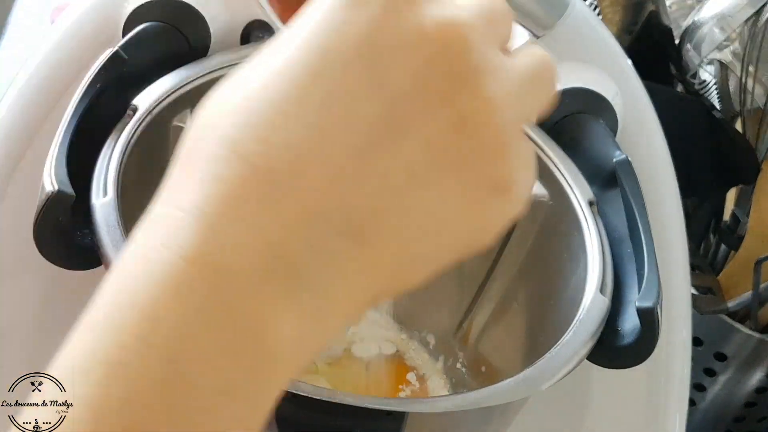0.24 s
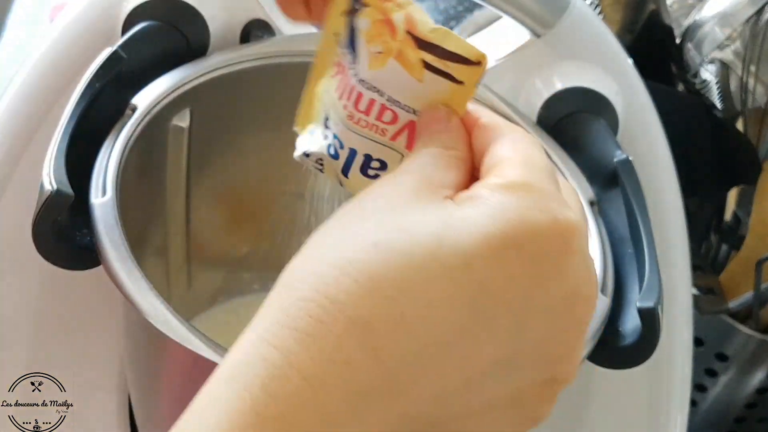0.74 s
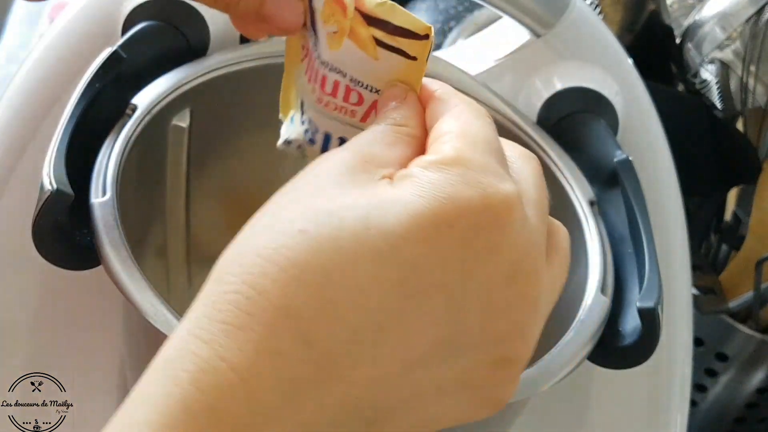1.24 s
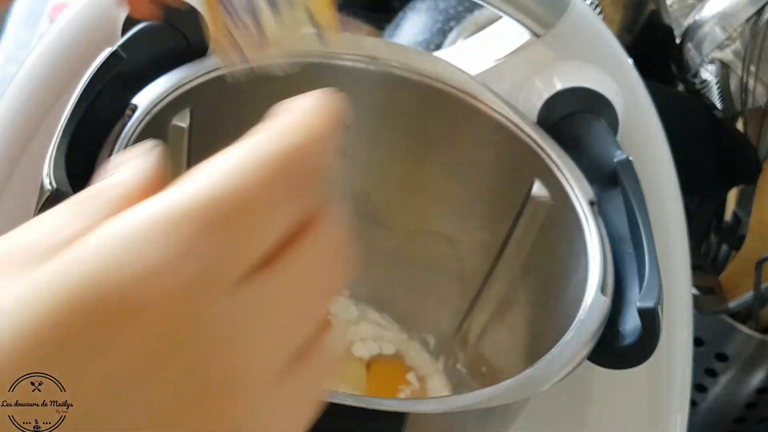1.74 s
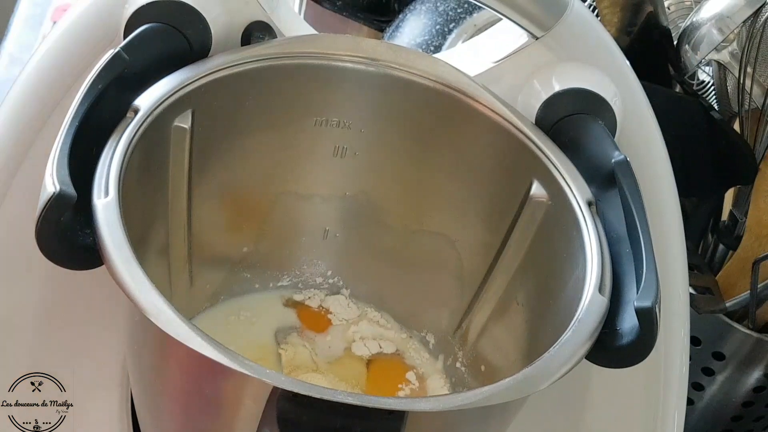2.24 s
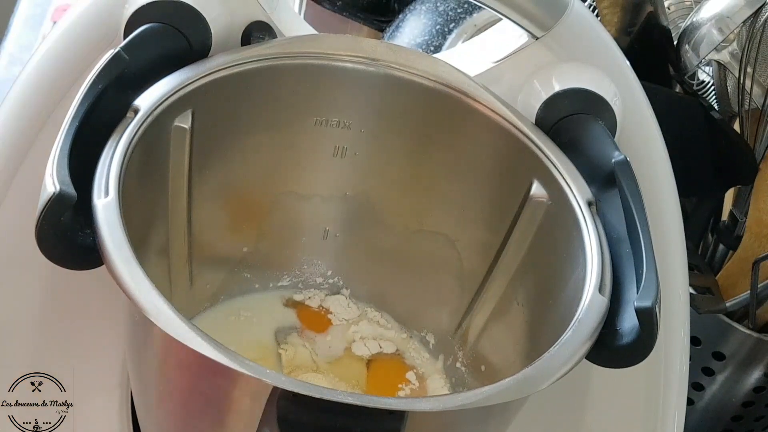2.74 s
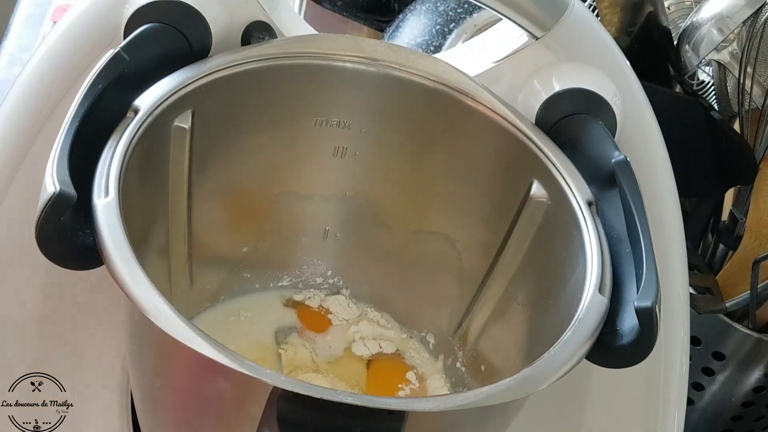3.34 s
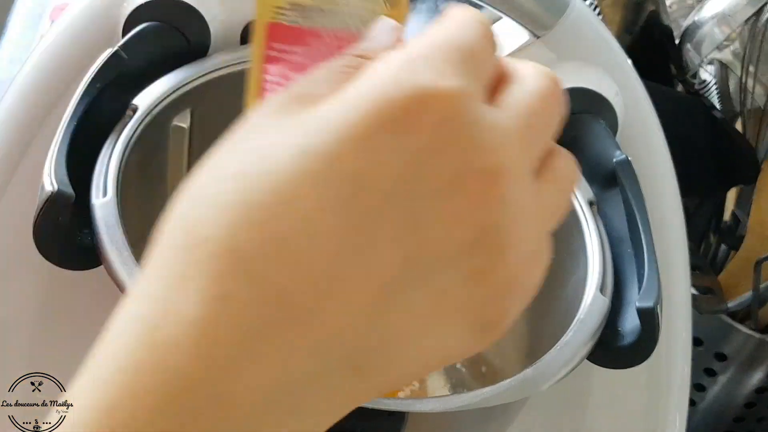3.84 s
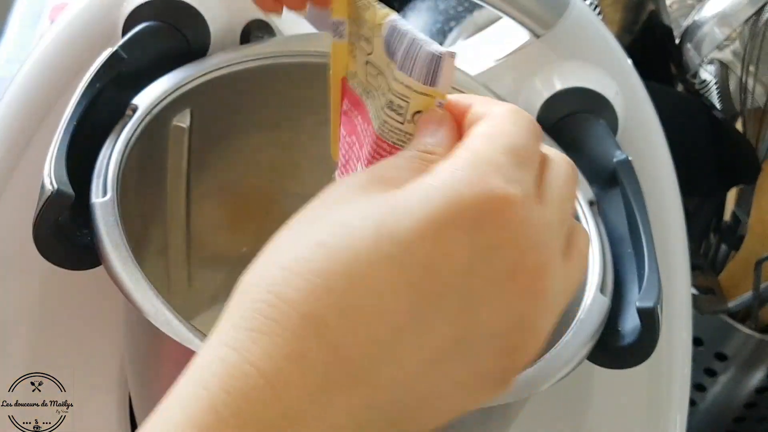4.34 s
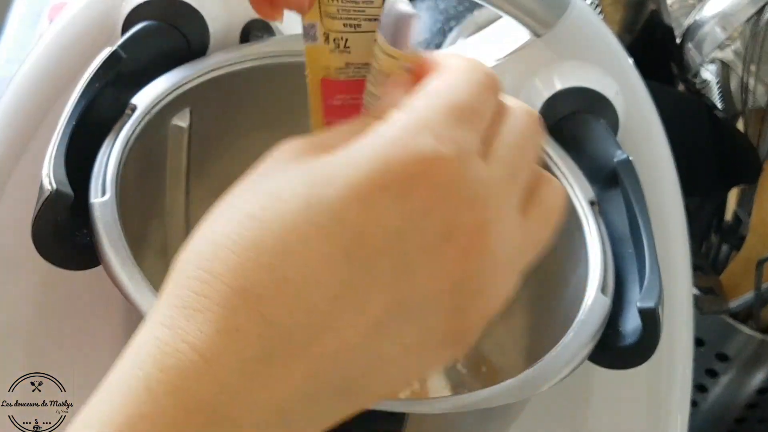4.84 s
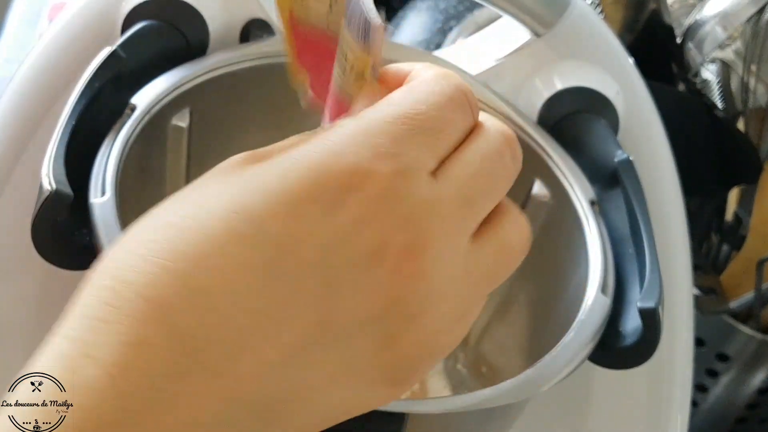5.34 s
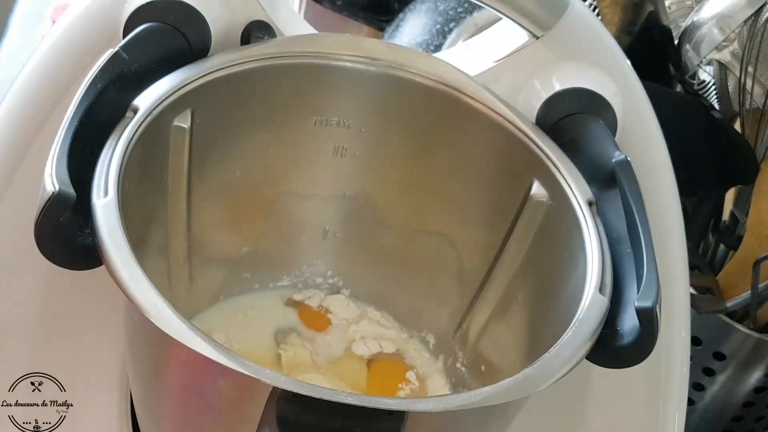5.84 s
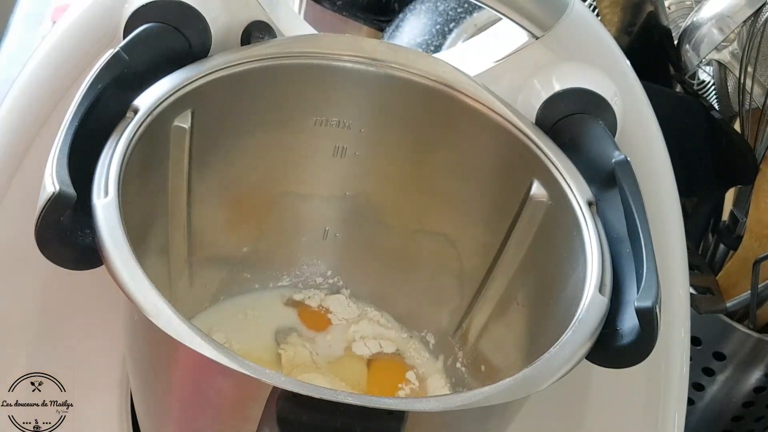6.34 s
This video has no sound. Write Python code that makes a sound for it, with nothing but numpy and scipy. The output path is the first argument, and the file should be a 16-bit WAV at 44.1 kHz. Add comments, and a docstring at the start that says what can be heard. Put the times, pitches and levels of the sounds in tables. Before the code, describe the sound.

Close stereo pickup over a mixing bowl: quick dry paper taps mixed with soft bright powder hiss, a low faint hum underneath. A pause holds a soft bump, a loud hard knock with clatter, and paper crinkling. Then another hiss of powder, a crinkle and a few sharp flicks, with short kitchen echoes before near silence.

```python
"""Small paper sachets are shaken empty over a steel mixing bowl in a kitchen. Flicks, rustles and tiny creases
are noise bursts and grains through the resonances of the paper; the powder is a bright noise hiss in surges.
Between the sachets something hard is knocked down on the worktop and bounces: decaying modes with a noisy
rattle, and a soft dull bump of low modes. A low hum, nearly a sine, wavers, slides down and fades over
the quiet room air, two beds of steady noise and the kitchen's short echoes."""
import sys
import numpy as np
from scipy import signal
from scipy.io import wavfile

SR = 44100
rng = np.random.default_rng(int(sys.argv[2]) if len(sys.argv) > 2 else 0)


def digitize_waveform(pressure):
    """Quantize a signal to 16-bit integers and store it at the path in sys.argv[1].

    Rows of a 2-D input are taken as channels; values are limited to [-1, 1].
    """
    field = np.atleast_2d(pressure).T
    bounded = np.clip(field, -1, 1)
    quanta = np.round(bounded * 32767).astype(np.int16)
    wavfile.write(sys.argv[1], SR, quanta)


N = 290775   # length in samples

# resonances of the air pocket in the sachet: pitch_hz, width_hz, level_db
BODY_MODES = [(432, 198, 1.5), (694, 220, 1.5), (1147, 420, -1), (1580, 560, 3)]
# bright resonances of a sharp crease, also the crack of a knock: pitch_hz, width_hz, level_db
EDGE_MODES = [(5000, 4000, 1.5), (8570, 2350, -7.5), (12400, 15000, -6.5)]

STEADY_FLICKER_DB = 0.5   # depth of the level flicker in powder and room air


def from_db(db):
    """Decibels to amplitude."""
    return 10 ** (np.asarray(db) / 20)


def rms_one(x):
    """Scale to an rms of 1."""
    return x / np.sqrt(np.mean(x ** 2) + 1e-20)


def peak_one(x):
    """Scale to a peak of 1."""
    return x / np.max(np.abs(x))


def level_in_time(points):
    """Straight lines in dB between the (s, dB) points, one value per sample."""
    s, level_db = np.transpose(points)
    return np.interp(np.arange(N) / SR, s, level_db)


def at_hz(points, hz):
    """Read a (Hz, value) curve along a logarithmic pitch axis."""
    curve = np.array(points)
    return np.interp(np.log(hz), np.log(curve[:, 0]), curve[:, 1])


def drift(rate_hz):
    """Slow random wander of rms 1: noise through a double low-pass, made at a 40th of the sample rate."""
    r = np.exp(-80 * np.pi * rate_hz / SR)
    noise = rng.standard_normal(N // 40 + 2002)
    slow = signal.lfilter([1], [1, -2 * r, r * r], noise)[2000:]   # drop the filter's run-in
    return np.interp(np.arange(N) / 40, np.arange(len(slow)), rms_one(slow))


def ring(clicks, hz, t60):
    """A unit click sets a decaying sine ringing, height 1 before the decay."""
    r = from_db(-60 / (t60 * SR))
    w = 2 * np.pi * hz / SR
    return signal.lfilter([0, np.sin(w)], [1, -2 * r * np.cos(w), r * r], clicks + 1e-18)


def resonate(x, modes):
    """Parallel band-pass resonances of alternating sign."""
    out = 0
    for k, (hz, width_hz, level_db) in enumerate(modes):
        r = np.exp(-np.pi * width_hz / SR)
        gain = (-1) ** k * from_db(level_db) * (1 - r * r) / 2
        feedback = [1, -2 * r * np.cos(2 * np.pi * hz / SR), r * r]
        out = out + signal.lfilter([gain, 0, -gain], feedback, x)
    return out


def half_octaves():
    """Half-octave band-passes from 20 Hz up, each with its centre in Hz."""
    edges = 20 * 2 ** np.arange(0, 10.1, .5)
    return [(np.sqrt(lo * hi), signal.butter(2, [lo, hi], "band", fs=SR, output="sos"))
            for lo, hi in zip(edges, edges[1:])]


def burst(t60, rise=0, size=8192):
    """Noise that swells for the rise time and dies away; without a rise it opens with a sharp contact."""
    snap_db = 18   # first contact over the noise that follows
    t = np.arange(size) / SR
    noise = rng.standard_normal(size)
    if rise == 0:
        noise[0] = from_db(snap_db)
    swell = np.clip(t / rise, 0, 1) ** 2 if rise else 1
    return noise * swell * from_db(-60 * np.maximum(t - rise, 0) / max(t60, .002))


def add(track, s, sound):
    """Mix a sound into the track from s seconds on."""
    i = round(s * SR)
    track[..., i:i + sound.shape[-1]] += sound[..., :N - i]


def banded_noise(spectrum, likeness, flicker_db):
    """Stereo noise band by band, each with its own level, flicker and left-right likeness; rms 1."""
    out = 0
    together = drift(0.3)   # flicker common to all bands
    white = rng.standard_normal((2, 2, N))
    for k, (hz, sos) in enumerate(half_octaves()):
        mid, side = signal.sosfilt(sos, white[k % 2])
        alike = np.clip(at_hz(likeness, hz), -1, 1)
        gain = from_db(at_hz(spectrum, hz) + flicker_db * (2.1 * together + drift(3.7)))
        out = out + gain * (np.sqrt(1 + alike) * mid + np.sqrt(1 - alike) * side * [[1], [-1]])
    return rms_one(out)


def sheet(hz):
    """The sheet's resonances scale with the size of the free panel."""
    # paper sheet: pitch_ratio, width_ratio (both times the sheet pitch), level_db
    sheet_modes = [(0.699, 0.53, -4), (0.998, 0.13, 3), (1.35, 0.7, -11), (1.899, 0.82, -15.5)]
    return [(ratio * hz, width * hz, level_db) for ratio, width, level_db in sheet_modes]


def paper(t60, rise, sheet_db, body_db, edge_db, hz):
    """One burst through the sheet, the air pocket and the crease; the two sides hear it a little differently."""
    alike = 0.41   # left-right likeness
    shared = burst(t60, rise)
    apart = np.array([burst(t60, rise), burst(t60, rise)])
    hit = np.sqrt(alike) * shared + np.sqrt(1 - alike) * apart
    return (from_db(sheet_db) * peak_one(resonate(hit, sheet(hz)))
            + from_db(body_db) * peak_one(resonate(hit, BODY_MODES))
            + from_db(edge_db) * peak_one(resonate(hit, EDGE_MODES)))


def flicks():
    """Fingers flick the sachet: bursts with a sharp contact excite the paper."""
    # finger flicks: start_s, sheet_db, hollow_body_db, bright_edge_db (peaks before panning), sheet_hz, t60_s
    flick_rows = [(0.251, -45, -42, -70, 2150, 0.038), (0.341, -30.5, -30, -54, 2200, 0.028),
                  (0.5724, -21, -30, -66, 2330, 0.041), (0.5790, -26, -43, -62, 2250, 0.038),
                  (0.8002, -28, -37, -57, 3000, .04), (0.8806, -15.5, -24, -56, 2560, 0.052),
                  (1.2067, -41, -65, -57, 1860, 0.078), (1.2284, -26, -29.5, -62, 2190, 0.045),
                  (1.3026, -24, -26, -75, 2395, 0.059), (1.361, -36, -33.5, -75, 2000, 0.026),
                  (1.4227, -19, -28.5, -29.5, 2440, 0.051), (1.4493, -42, -38, -34, 2560, 0.071),
                  (4.6884, -29, -31.5, -27.5, 3060, 0.052), (4.8613, -25.5, -41, -29, 2520, 0.043),
                  (4.9926, -16.5, -28.5, -23.5, 2780, 0.058)]
    out = np.zeros((2, N))
    for s, sheet_db, body_db, edge_db, hz, t60 in flick_rows:
        add(out, s, paper(t60, 0, sheet_db, body_db, edge_db, hz))
    return out


def rustles():
    """Softer movements of the sachet: bursts that swell and die excite the same paper."""
    # short rustles: start_s, sheet_db, hollow_body_db, bright_edge_db (peaks before panning),
    # sheet_hz, rise_s, t60_s
    rustle_rows = [(0.764, -37.5, -43, -43, 1930, 0.0029, 0.16),
                   (0.994, -41.5, -38.5, -61, 2430, 0.0054, 0.055),
                   (1.05, -45, -38, -55, 2430, 0.0084, 0.062), (1.738, -48, -48, -53.5, 2250, 0.0066, 0.16),
                   (1.753, -41, -62, -44, 2600, 0.0298, 0.02),
                   (2.756, -37.5, -38.5, -45.5, 2640, 0.018, 0.24),
                   (3.305, -49.5, -71, -55, 2680, 0.019, 0.37), (3.598, -51.5, -65, -56, 1980, 0.0056, 1),
                   (3.700, -40, -45.5, -47.5, 2220, 0.014, 0.086),
                   (4.031, -47, -45, -62, 2320, 0.0024, 0.063),
                   (4.419, -29.5, -39, -49, 2400, 0.013, 0.013),
                   (4.49, -30.5, -32, -48, 2200, 0.0087, 0.16), (4.601, -41.5, -50, -54, 2370, .018, 0.14),
                   (4.630, -37, -39, -51, 2400, 0.018, 0.044), (4.968, -40.5, -38, -50, 2920, 0.015, 0.11),
                   (5.461, -50, -67, -46, 2480, 0.022, 0.13)]
    out = np.zeros((2, N))
    for s, sheet_db, body_db, edge_db, hz, rise, t60 in rustle_rows:
        add(out, s, paper(t60, max(rise, .001), sheet_db, body_db, edge_db, hz))
    return out


def crinkle(per_s=4000):
    """Tiny creases give way in clumps and ring the sheet, the air pocket and the sharp edges."""
    # paper crinkle while hands move the sachets: time_s, level_db
    crinkle_level = [(0, -70.5), (.2, -71.5), (.33, -62.5), (.6, -66), (.95, -57), (1.04, -57), (1.12, -81),
                     (1.6, -71), (2.3, -76), (2.48, -63.5), (2.6, -49.5), (2.8, -58.5), (2.97, -72),
                     (3.15, -72.5), (3.28, -68.5), (3.45, -73), (3.68, -61.5), (3.86, -76), (4.04, -78),
                     (4.14, -82), (4.23, -50), (4.31, -53.5), (4.47, -61), (4.75, -69.5), (5.2, -70),
                     (5.5, -129)]
    sheet_hz, body_db, edge_db = 2278, -4, -18   # air pocket and creases relative to the sheet
    sizes = from_db(2.7 * np.minimum(rng.exponential(1, N), 5)) * rng.choice([-1, 1], N)
    clumps = from_db(4 * drift(25))
    grains = sizes * (rng.random(N) < per_s * clumps / SR)
    sound = (resonate(grains, sheet(sheet_hz))
             + from_db(body_db) * resonate(grains, BODY_MODES)
             + from_db(edge_db) * resonate(grains, EDGE_MODES))
    return from_db(level_in_time(crinkle_level)) * rms_one(sound)


def flow():
    """Powder slides out in surges: each swells, holds and trails off; their powers add."""
    # surges as the sachet is tipped and shaken: start_s, hold_s, level_db
    surges = [(0.097, 0.11, -62), (0.25, 0.6, -57.5), (0.62, 0.053, -52.5), (0.73, 0.18, -62),
              (0.967, 0.02, -54.5), (1.182, 0.011, -57.5), (3.843, 0.03, -63), (3.912, 0.19, -53),
              (4.09, 0.092, -49.5), (4.22, 0.22, -61.5), (4.47, 0.12, -59.5)]
    rise_s, t60_s = .055, .28
    t = np.arange(N) / SR
    power = 0
    for s, hold, level_db in surges:
        swell = np.clip((t - s) / rise_s, 0, 1) ** 2
        since_hold = np.maximum(t - s - rise_s - hold, 0)
        power = power + (swell * from_db(level_db - 60 * since_hold / t60_s)) ** 2
    return np.sqrt(power)


def powder(flutter_db=0.5, grain_db=1.0):
    """Grains slide out too densely to count: a bright hiss that flutters as they clump."""
    # colour of the powder: pitch_hz, relative level_db per Hz
    powder_colour = [(1500, -6), (2500, 1.5), (4000, -1), (6000, -6.5), (9000, -5), (12500, -7),
                     (16000, -7)]
    hiss = banded_noise(powder_colour, [(1000, 0.067), (16000, 0.043)], STEADY_FLICKER_DB)
    return flow() * from_db(flutter_db * drift(30) + grain_db * drift(170)) * hiss


def knocks():
    """The first contact sets the modes ringing, the rattle after it clatters; a longer contact is duller."""
    # knock and bounces on the worktop: start_s, peak_db (before low cut and panning), contact_s, rattle_t60_s
    knock_rows = [(2.507, -31, 0.00014, 0.02), (2.516, -15, 0.000014, 0.21), (2.6745, -35, 0.000013, 0.16),
                  (2.714, -32, 0.00029, 0.029), (2.825, -34.5, 0.000013, 0.18),
                  (2.916, -37.5, 0.00011, 0.011)]
    # worktop and knocked object: pitch_hz, level_db (before scatter), longest t60_s
    worktop_modes = [(119.4, -8.5, 0.49), (167, -4, 0.31), (230, -16, 0.16), (295, 2, 0.35),
                     (407, -3, 0.089), (530, -7, 0.15), (670, 6.5, 0.095), (823, 2, 0.086), (996, 1, 0.086),
                     (1160, -5.5, 0.033), (1544, 0, 0.18), (1850, -1.5, 0.083), (2070, -14, 0.072),
                     (2830, -11, 0.036), (2960, 3, 0.12), (3720, -28, 0.031), (4540, 1, 0.034)]
    clatter_hz, clatter_db, crack_db = 2570, 22, -4   # broad clatter and crack over the modes
    scatter_db = 2   # each blow lands elsewhere
    settle_s = .03   # a mode's t60 is at most this much longer than the rattle's
    size = 16384
    click = signal.unit_impulse(size)
    out = np.zeros((2, N))
    for s, peak_db, contact, t60 in knock_rows:
        apart = np.array([burst(t60, size=size), burst(t60, size=size)])
        rattle = burst(t60, size=size) + 0.15 * apart
        crack = from_db(crack_db) * resonate(rattle, EDGE_MODES)
        clatter = from_db(clatter_db) * resonate(rattle, sheet(clatter_hz))
        modes = 0
        for hz, level_db, mode_t60 in worktop_modes:
            height = from_db(level_db + scatter_db * rng.standard_normal())
            modes = modes + height * ring(click, hz, min(mode_t60, t60 + settle_s))
        r = np.exp(-1 / (max(contact, 1e-5) * SR))
        sound = signal.lfilter([(1 - r) ** 2], [1, -2 * r, r * r], crack + clatter + modes)
        add(out, s, from_db(peak_db) * peak_one(sound))
    return signal.sosfilt(signal.butter(4, 90, "high", fs=SR, output="sos"), out)


def bump():
    """A soft dull bump with a short shudder: smooth pushes into low modes."""
    # pushes: start_s, peak_db (before panning)
    bump_rows = [(1.648, -42.5), (1.673, -40), (1.697, -46.5)]
    # what the bump rings with: pitch_hz, level_db, t60_s
    bump_modes = [(205, -4, 0.1), (306, -4, 0.05), (378, 0, 0.3), (496, -8, 0.034)]
    push_s = .0015
    force = np.zeros(16384)
    add(force, 0, np.hanning(round(push_s * SR)))
    thud = peak_one(sum(from_db(db) * ring(force, hz, t60) for hz, db, t60 in bump_modes))
    out = np.zeros(N)
    for s, peak_db in bump_rows:
        add(out, s, from_db(peak_db) * thud)
    return out


def hum():
    """A near sine that wavers, slides down and fades."""
    # hum before the waver: time_s, rms level_db
    hum_level = [(0, -53.5), (.25, -66.5), (.33, -57), (.5, -71), (.6, -60), (1.5, -62.5), (1.85, -84),
                 (2.03, -63.5), (2.35, -73)]
    start_hz, sag_hz_per_s, waver_db = 90.6, 3.6, 1.5
    t = np.arange(N) / SR
    fade = np.clip((hum_level[-1][0] - t) / 0.033, 0, 1)   # silent from the last point on
    level = from_db(level_in_time(hum_level) + waver_db * drift(12))
    turns = start_hz * t - sag_hz_per_s * t ** 2 / 2
    return np.sqrt(2) * fade * level * np.sin(2 * np.pi * turns)


def kitchen(x):
    """Dense echoes: noise that dies band by band, shared between the sides mostly in the bass."""
    # decay of the kitchen: pitch_hz, t60_s
    kitchen_decay = [(150, 0.9), (500, 0.35), (2000, 0.23), (6000, 0.26), (14000, 0.022)]
    t = np.arange(SR // 2) / SR
    white = rng.standard_normal((2, 2, len(t)))
    echoes = 0
    for k, (hz, sos) in enumerate(half_octaves()):
        mid, side = signal.sosfilt(sos, white[k % 2])
        apart = np.clip(hz / 1000, .3, 1)
        decay = from_db(-60 * t / at_hz(kitchen_decay, hz))
        echoes = echoes + (mid + apart * side * [[1], [-1]]) * decay
    echoes = echoes * np.clip(t / 0.0025, 0, 1)   # the first walls answer after a few ms
    echoes = echoes / np.sqrt(np.sum(echoes ** 2) / 2)
    return signal.fftconvolve(x, echoes, axes=1)[:, :N]


def room_air():
    """Quiet room air: mostly low noise, alike on both sides in the bass, with a slight flicker."""
    # colour of the air: pitch_hz, relative level_db per Hz
    air_colour = [(12, -41), (20, 13), (27, -24.5), (108, 1), (140, -13), (185, -7), (235, -8.5),
                  (304, -3.5), (370, -9.5), (649, -14), (823, -22), (1040, -20), (1240, -18), (2640, -30),
                  (3500, -28.5), (4550, -51), (7700, -120)]
    # left-right likeness of the air: pitch_hz, likeness (-1 to 1)
    air_likeness = [(60, 0.86), (180, 0.79), (550, 0.53), (1650, 0.067), (4970, -0.71), (15000, -0.59)]
    level_db = -61   # rms before panning
    return from_db(level_db) * banded_noise(air_colour, air_likeness, STEADY_FLICKER_DB)


def mic_hiss():
    """Microphone hiss: steady bright noise, almost independent on the two sides."""
    # colour of the hiss: pitch_hz, relative level_db per Hz
    mic_colour = [(2000, -8), (4000, 3), (8000, -12.5), (10500, 18), (13000, -13.5), (16000, -0.5)]
    level_db = -72.5   # rms
    return from_db(level_db) * banded_noise(mic_colour, [(1000, 0), (16000, 0.012)], 0)


def late_right(x):
    """Sound from over the bowl reaches the left port first."""
    lag_s = .00037
    return np.array([x[0], np.roll(x[1], round(lag_s * SR))])


def pan(db):
    """Left and right gains; positive leans right by twice this many dB."""
    return from_db([[-db], [db]])


def scene():
    """Sachets over the bowl, the worktop, the kitchen's answer and its air."""
    sachet = (flicks() + rustles()) * pan(-(-1.5) / -2)
    sachet = sachet + crinkle() * pan(.6)
    over_bowl = late_right(sachet + powder())
    worktop = knocks() + bump()
    echoes = from_db(-8) * kitchen(sachet + worktop)
    background = hum() + room_air() * pan(.5) + mic_hiss()
    return over_bowl + worktop * pan(.7) + echoes + background


def record(dry):
    """The top is cut steeply."""
    cutoff_hz = 15700
    return signal.sosfilt(signal.ellip(14, .5, 80, cutoff_hz, fs=SR, output="sos"), dry)


dry = scene()
out = record(dry)
digitize_waveform(out)
```